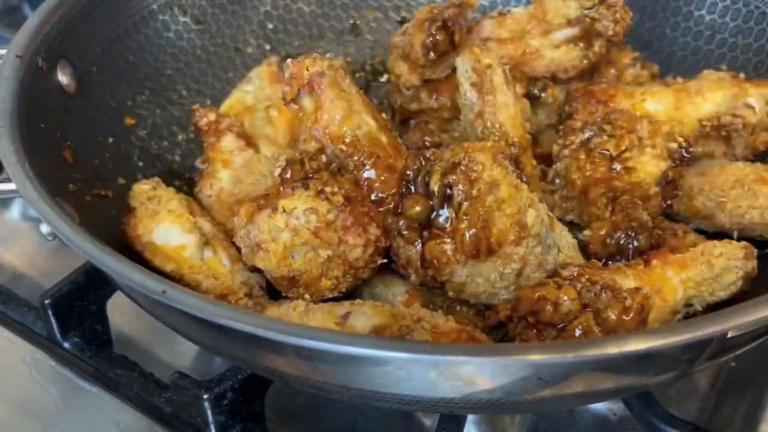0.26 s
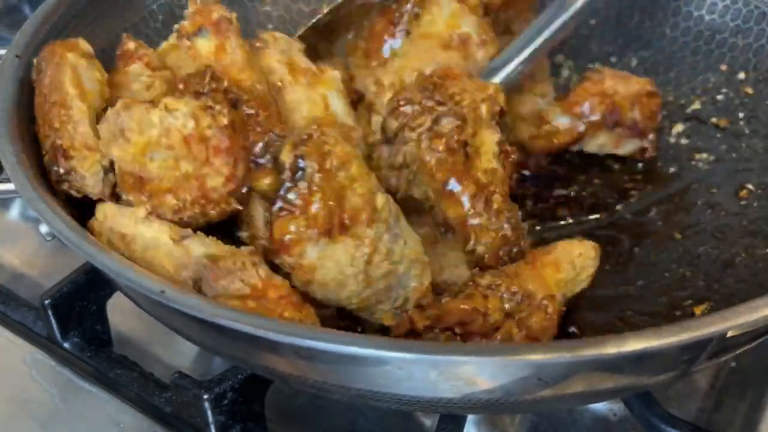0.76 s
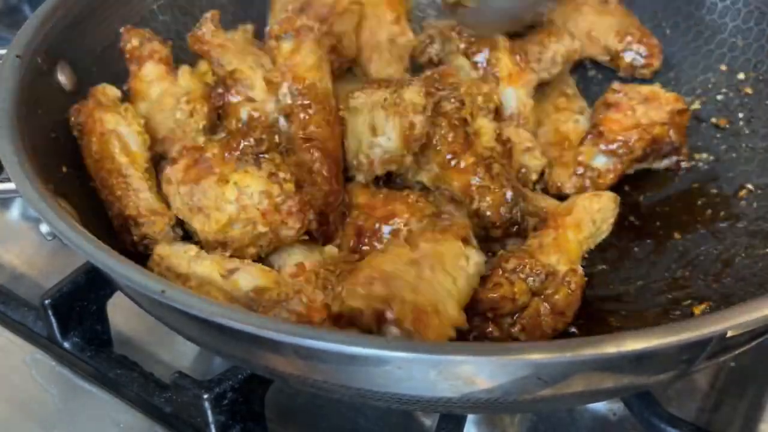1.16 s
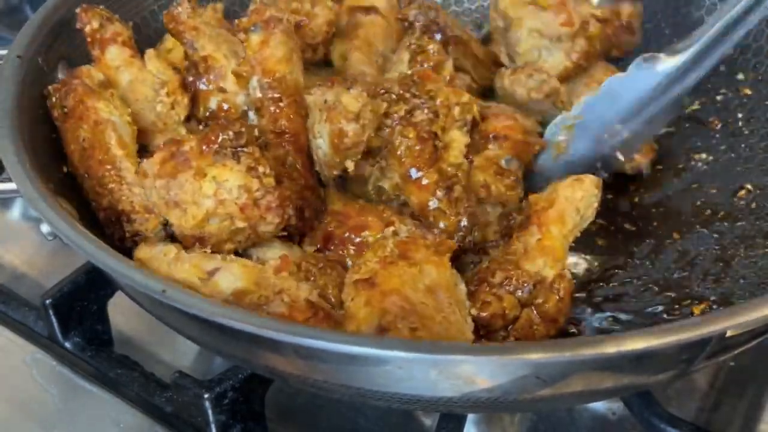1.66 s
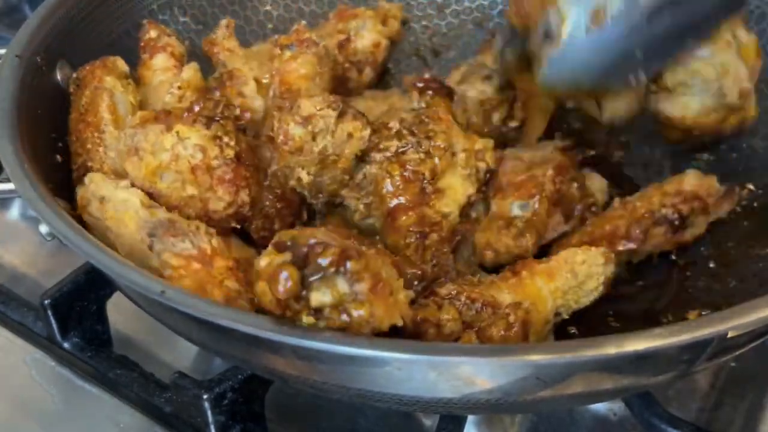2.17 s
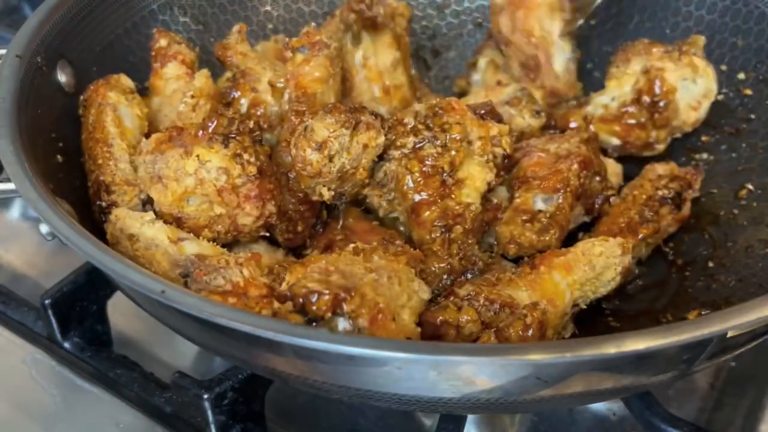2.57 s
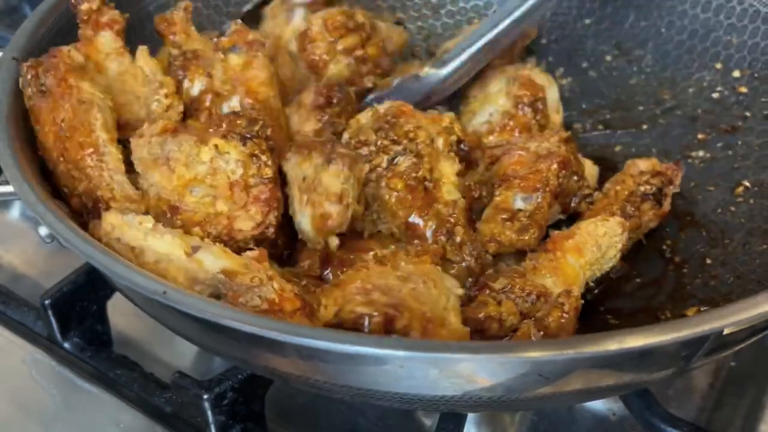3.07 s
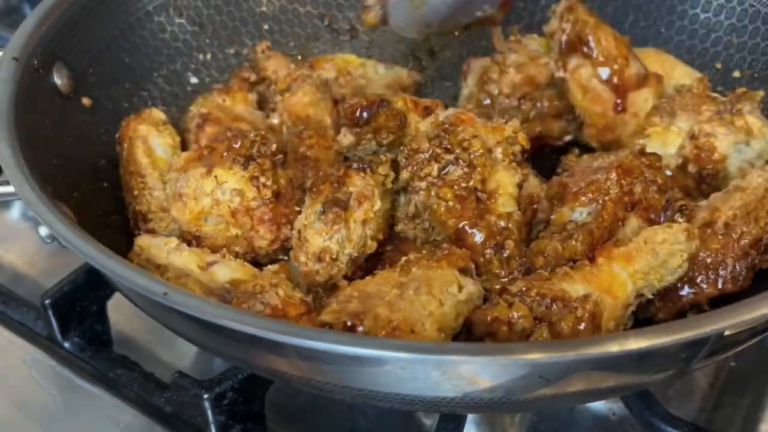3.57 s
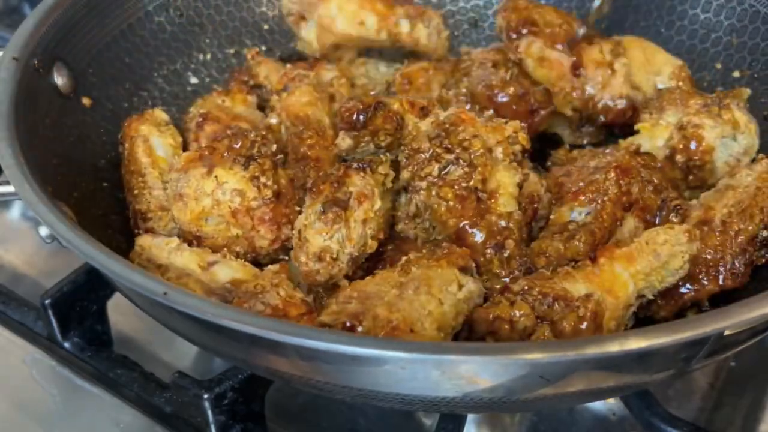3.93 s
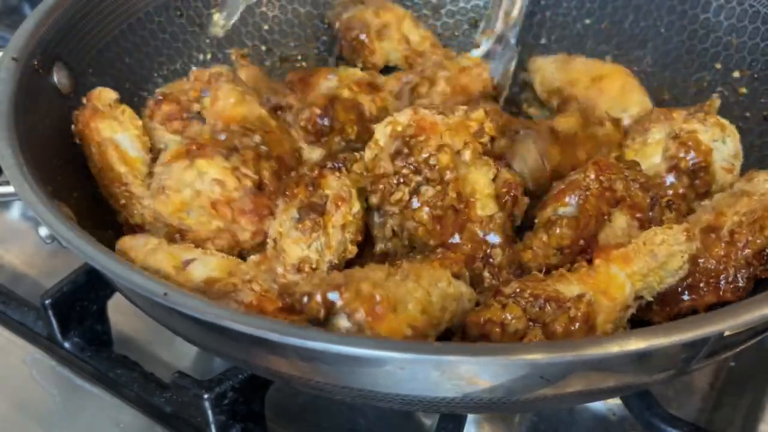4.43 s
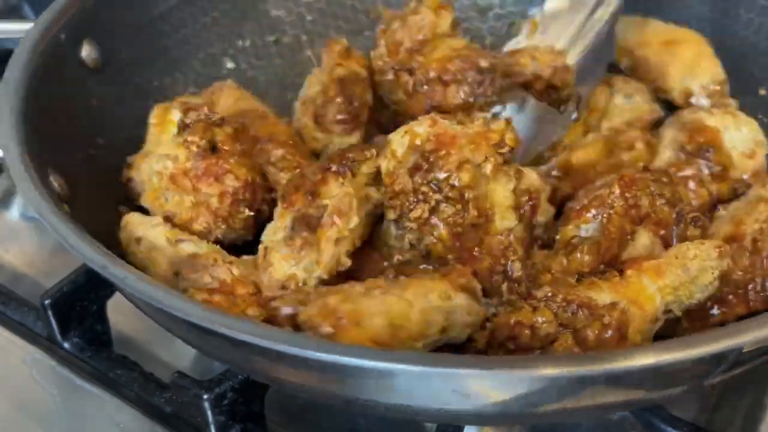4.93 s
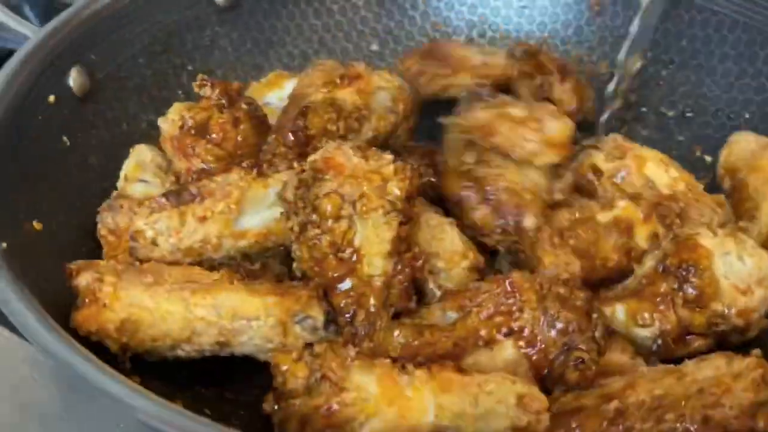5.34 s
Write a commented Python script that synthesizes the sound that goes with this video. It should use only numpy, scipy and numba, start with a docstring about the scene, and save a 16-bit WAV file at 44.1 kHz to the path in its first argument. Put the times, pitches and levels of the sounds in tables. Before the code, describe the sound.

Steel tongs scrape and clank in a steel wok as sticky, crusty fried chicken wings are shoved, turned and tumbled, heard close up.

```python
"""Tongs turning sticky wings in a wok

Steel tongs turn sticky fried chicken wings in a steel wok on a kitchen hob, heard from close by.
Strokes land with clanks: a noise burst, a sine ping and the decaying modes of the bowl.
Random tiny slips make the tips judder over the steel, the crusts crackle and the soft pieces thud.
Underneath, filtered noise gives a low kitchen rumble, a faint hiss and the wok rocking on its stand."""
import sys
import numpy as np
from scipy import signal
from scipy.fft import rfft, irfft, next_fast_len
from scipy.io import wavfile
from scipy.ndimage import uniform_filter1d
from numba import njit

SR = 44100
rng = np.random.default_rng(int(sys.argv[2]) if len(sys.argv) > 2 else 0)


def master(y):
    """Save y as 16-bit WAV."""
    cut = np.clip(np.atleast_2d(y).T, -1, 1)
    pcm = np.round(cut * 32767)  # scale
    wavfile.write(sys.argv[1], SR, pcm.astype(np.int16))


N = 246959  # length of the scene [samples]
TIME = np.arange(N) / SR  # [s]


def undb(db):
    """Turn decibels into a gain."""
    return 10 ** (np.asarray(db) / 20)


def unit(x):
    """Scale a sound to rms 1."""
    return x / np.sqrt(np.mean(x ** 2))


def colour(x, points):
    """Shape a sound by (pitch [Hz], level [dB]) points, causally, so that attacks stay sharp."""
    hz, db = np.transpose(points)
    size = 2 * next_fast_len(x.shape[-1])
    f = np.maximum(np.fft.rfftfreq(size, 1 / SR), 1)
    curve = np.log(undb(np.interp(np.log(f), np.log(hz), db)))
    low_cut = 2 * np.log(np.minimum(f / hz[0], 1) + 0.056)  # falls away below the first point
    # folding the cepstrum forward in time gives the filter its minimum phase
    cepstrum = irfft(curve + low_cut)
    cepstrum[1:size // 2] *= 2
    cepstrum[size // 2 + 1:] = 0
    shaped = irfft(rfft(x, size) * np.exp(rfft(cepstrum)))
    return shaped[..., :x.shape[-1]]


def pair(length, width):
    """Noise at the two microphones; width is the size of the part in which they differ."""
    mid, side = rng.standard_normal((2, length))
    return np.array([mid + width * side, mid - width * side]) / np.sqrt(1 + width ** 2)


def held(t, hold_s, t60):
    """Gain 1 for a while, then an exponential decay that loses 60 dB in t60 seconds."""
    return np.exp(-np.log(1000) * np.maximum(t - hold_s, 0) / t60)


def fade(t60, length):
    """Exponential decay from the first sample on."""
    return held(TIME[:length], 0, t60)


def through(x, response):
    """Play a sound through an impulse response."""
    return signal.oaconvolve(np.atleast_2d(x), response, axes=1)[:, :N]


def add(out, sound, s):
    """Mix a sound in at a time in seconds."""
    start = int(s * SR)
    out[:, start:start + sound.shape[1]] += sound[:, :N - start]


def even(x, span_s=0.037):
    """Hold a texture near rms 1 over the span, so that the hand alone sets its swell; finer grit stays."""
    size = int(span_s * SR)
    power = np.mean(x ** 2, axis=0)
    smooth_power = uniform_filter1d(uniform_filter1d(power, size), size)
    return x / np.sqrt(smooth_power + 1e-12)


def walk(rate):
    """Smooth random drift with a spread near 1 and `rate` new values a second."""
    knots = rng.standard_normal(N // 50)
    return np.interp(TIME * rate, np.arange(len(knots)), knots)


def slips(rate, scatter_db, judder_db, judder_rate):
    """Tiny contacts that catch and let go: uneven in size, and swelling in bunches as the tips judder."""
    happens = rng.random(N) < rate / SR
    uneven_db = scatter_db * np.minimum(rng.exponential(size=N), 4)
    size = undb(uneven_db + judder_db * walk(judder_rate))
    return happens * size * rng.choice([-1, 1], N)


def dense_ring(points, t60, width):
    """Countless overlapping modes of a sheet: a burst of decaying, coloured noise."""
    return colour(pair(SR // 12, width) * fade(t60, SR // 12), points)


def sliding(x, points, t60, width, rate, count=6):
    """A sheet excited at a moving spot: the mix of its modes keeps shifting."""
    weights = np.array([walk(rate) for _ in range(count)])
    weights /= np.sqrt(np.sum(weights ** 2, axis=0))
    return sum(w * through(x, dense_ring(points, t60, width)) for w in weights)


@njit
def resonate(x, hz, width):
    """A resonance with a moving centre: a state-variable band-pass, width in Hz."""
    y, band, low = np.empty(len(x)), 0., 0.
    for i in range(len(x)):
        g, damping = np.tan(np.pi * hz[i] / SR), width / hz[i]
        v = (band + g * (x[i] - low)) / (1 + g * (g + damping))
        band, low, y[i] = 2 * v - band, low + 2 * g * v, damping * v
    return y


# colour of the low kitchen rumble: (pitch [Hz], relative level [dB per Hz])
RUMBLE_COLOUR = [(13, -1), (22, -33), (43, -6), (91, -5), (124, -3), (140, -2.5), (157, -30), (181, -10),
                 (205, -13.5), (224, -5), (244, 0), (286, -18), (336, -12.5), (420, -16), (550, -44),
                 (920, -120)]
# colour of the faint hiss: (pitch [Hz], relative level [dB per Hz])
HISS_COLOUR = [(250, 9.5), (500, 1.5), (1000, -8), (3000, -12.5), (9000, -31), (13000, -73)]


def kitchen(rocking_gain):
    """A steady low rumble and a faint wavering hiss of noise, and the wok rocking dully on its stand."""
    rumble = unit(colour(pair(N, width=0.038), list(RUMBLE_COLOUR) + [(900, -43), (3000, -66)]))
    hiss = unit(colour(pair(N, width=0.57), HISS_COLOUR)) * undb(0.85 * walk(19))
    stand = [(35, -14.5), (55, 0.5), (80, -4.0), (100, -6.0), (125, 4.0),
             (165, -20.0), (225, -14.5), (300, -14), (1000, -85.5)]
    rocking = even(colour(pair(N, width=0.16), stand), span_s=0.37)
    return undb(-38.5) * rumble + undb(-44.0) * hiss + rocking_gain * rocking


# the tips sliding over the steel: (time [s], length [s], push on the bowl [dB], rasp of the blades [dB],
# push on the crust [dB], pitch of the hollow under the tips at the start [Hz], at the end [Hz],
# share of the hollow [dB])
SLIDES = [(.24, 0.23, -29, -20.5, -15.5, 1700, 1680, -3), (.395, 0.27, -12, -17.5, -19.5, 1600, 1040, -6),
          (1.405, 0.041, -13, -32, -28, 970, 980, -11), (1.455, 0.033, -13.5, -22.5, -27, 1010, 1070, -5),
          (1.585, 0.073, -17, -19, -22, 1020, 1070, 0.5), (1.635, 0.12, -15, -17, -20, 1060, 1520, -7.5),
          (1.77, 0.11, -26.5, -34.5, -37, 1440, 1150, -16), (2.17, 0.043, -28, -32, -29.5, 990, 990, -5.5),
          (2.725, 0.14, -12.5, -18.5, -20.5, 910, 850, -7), (2.86, 0.1, -19.5, -24.5, -22.5, 860, 930, -15),
          (3.02, 0.21, -26, -35, -27.5, 1030, 1060, -6), (3.2, 0.08, -26, -32.5, -26.5, 1110, 1120, -15),
          (4.155, 0.16, -26.5, -25, -23, 1650, 1720, -2), (4.295, 0.12, -15, -18, -18, 1660, 1440, -3),
          (4.435, 0.11, -14, -24.5, -25, 1220, 1110, -16), (4.54, 0.12, -19, -24, -25, 1050, 980, -4.5),
          (4.715, .11, -19, -18, -19.5, 1140, 1310, -31), (4.85, .11, -24, -30, -27, 1260, 1310, -9.5),
          (5.015, 0.11, -20.5, -24.5, -27, 1380, 1120, 1.5), (5.125, 0.11, -25, -26, -27.5, 1160, 990, -1),
          (5.405, 0.17, -25.5, -16, -15, 815, 548, 4.5)]


def hollow_glide():
    """The hollow between tips and bowl glides through each scrape: its pitch in Hz and its share in dB."""
    hz, db = np.full(N, float(SLIDES[0][-3])), np.full(N, float(SLIDES[0][-1]))
    for s, length, *_, start_hz, end_hz, share_db in SLIDES:
        glide = np.interp(TIME, [s, s + length], [start_hz, end_hz])
        hz = np.where(TIME >= s, glide, hz)
        db = np.where(TIME >= s, share_db, db)
    return uniform_filter1d(hz, SR // 50), uniform_filter1d(db, SR // 50)


def swell(s, length, attack_s, release_s, sag_db_per_s=0):
    """One push of the hand as a gain: it builds, holds while sagging, and dies away."""
    t = np.maximum(TIME - s, 0)
    return np.minimum(t / attack_s, 1) * held(t, length, release_s) * undb(-sag_db_per_s * t)


def together(gains):
    """Unrelated sounds sum in power."""
    return np.sqrt(sum(g ** 2 for g in gains) + 1e-12)


# sticky wings pushed over one another: (time [s], length [s], push on the crust [dB])
PUSHES = [(.005, 0.075, -43.5), (0.653, 0.21, -36), (0.865, 0.077, -30), (0.944, 0.12, -38),
          (1.042, 0.087, -37.5), (1.327, 0.061, -27.5), (1.543, 0.058, -35), (1.869, 0.086, -33.5),
          (1.964, 0.062, -45), (2.057, 0.096, -33), (2.215, 0.043, -37.5), (2.31, .02, -45),
          (2.359, 0.02, -33), (2.398, 0.0066, -33.5), (2.472, 0.0063, -40.5), (2.587, 0.013, -37.5),
          (2.678, 0.13, -28.5), (2.936, 0.12, -32.5), (3.299, 0.026, -33), (3.374, .05, -42),
          (3.597, 0.024, -45), (3.666, .012, -37), (3.703, 0.051, -44.5), (3.84, 0.062, -39),
          (3.899, 0.032, -35), (3.982, 0.026, -38), (4.05, 0.029, -47), (4.676, .06, -26.5),
          (4.95, 0.11, -33), (5.271, 0.063, -31), (5.348, 0.065, -30)]
# pieces toppling back and rocking the wok: (time [s], length [s], push of the thuds [dB], rocking [dB])
TOPPLES = [(0, 0.05, -61, -33.5), (0.204, 0.1, -27, -31), (0.357, 0.3, -40, -40), (0.676, 0.16, -43, -35),
           (1.093, 0.13, -30.5, -27), (1.424, 0.071, -30.5, -30), (1.584, .1, -21, -36),
           (1.807, .06, -33, -28.5), (2.123, 0.12, -36, -36.5), (2.95, 0.27, -32.5, -35.5),
           (3.22, 0.082, -33.5, -38), (3.69, 0.07, -40.5, -33.5), (3.892, 0.061, -57, -31.5),
           (4.31, 0.059, -48, -53), (4.502, 0.14, -31, -31.5), (4.701, 0.065, -34, -48),
           (4.841, 0.13, -25.5, -32.5), (5.058, 0.2, -21, -31), (5.42, 0.092, -29, -49)]


def strokes():
    """How hard scrapes, shoves and tumbles drive the bowl, blades, crust, soft pieces and stand."""
    def scraped(column, sag_db_per_s):
        """Add up one column of pushes over all scrapes; the attack is a share of the length."""
        return together(undb(row[column]) * swell(row[0], row[1], 0.22 * row[1], 0.21, sag_db_per_s)
                        for row in SLIDES)

    bowl = scraped(2, 0)
    # a scrape dulls as the tips sink under the food
    blades, crust = scraped(3, 25), scraped(4, 27.5)
    shoved = together(undb(db) * swell(s, length, 0.32 * length, 0.15) for s, length, db in PUSHES)
    thuds, rocks = together(
        undb([[thud_db], [rock_db]]) * swell(s, length, attack_s=0.014, release_s=0.21)
        for s, length, thud_db, rock_db in TOPPLES)

    # a shove also rubs the steel and bumps the pieces
    bowl_gain = together([bowl, undb(1) * shoved])
    blade_gain = together([blades, undb(-7) * shoved])
    crust_gain = together([crust, shoved, undb(-53.5)])  # last: sauce ticking between strokes
    thud_gain = together([thuds, undb(-1.5) * shoved, undb(-15) * bowl])  # last: jostled by scrapes
    rocking_gain = together([rocks, undb(-43)])  # last: the stand's tremble between tumbles
    return bowl_gain, blade_gain, crust_gain, thud_gain, rocking_gain


# colour of the crackling crust: (pitch [Hz], relative level [dB per Hz])
CRUST_COLOUR = [(1500, -15), (4000, -1), (6500, 0), (7600, 1.5), (8700, 4), (10200, 3.5), (11500, 3.5),
                (12500, -1), (13500, -26)]
# colour of the soft tumbling pieces: (pitch [Hz], relative level [dB per Hz])
TUMBLE_COLOUR = [(90, -17.5), (170, -8.5), (260, -10.5), (370, -4), (480, -5), (620, -5), (800, -13),
                 (1300, -48)]


def food(crust_gain, thud_gain):
    """Crust and sauce crackle, in lone ticks when barely touched, densely when pushed; soft pieces thud."""
    pressure = np.sqrt(crust_gain / undb(-23.5))
    crackles = slips(rate=1100 * pressure + 120, scatter_db=2.5, judder_db=2.0, judder_rate=100)
    crust = even(sliding(crackles, CRUST_COLOUR, t60=0.027, width=0.061, rate=12), span_s=0.056)
    bumps = slips(rate=370, scatter_db=-0.5, judder_db=3.0, judder_rate=20)
    tumble = even(sliding(bumps, TUMBLE_COLOUR, t60=0.038, width=0.51, rate=6), span_s=0.14)
    return undb(0.5) * crust * crust_gain + undb(-0.5) * tumble * thud_gain


# modes of the bowl: (pitch [Hz], relative level when struck [dB], t60 when ringing freely [s])
BOWL_MODES = [(361.3, -11, 0.93), (445, -23, 1), (552, -5, 1), (610, -17, 0.85), (734, -8.5, 0.96),
              (882.8, 4, 0.71), (955, -17.5, 0.19), (984.5, -13, 0.96), (1233, -4, 0.19),
              (1404, -14.5, 0.23), (1623, -11.5, 0.38), (1690, -9, 0.21), (1750, -45, 0.11),
              (1873, -22.5, 0.17), (2110, -48, 0.49), (2060, -9.5, 0.17), (2200, -22, 0.13),
              (2484, -8, 0.2), (2820, -16, 0.38), (3070, -9, 0.11), (3000, -17, 0.56), (3600, -13, 0.077),
              (4100, -34, .14), (3750, -20, 0.21)]


def bowl_ring(share, scatter_db, spread, spot_hz, spot_db):
    """Decaying modes of the bowl: the spot touched favours those near one pitch; share scales their t60."""
    hz, db, t60 = np.transpose(BOWL_MODES)
    size, phase, lag = rng.standard_normal((len(BOWL_MODES), 3)).T
    favoured_db = db + spot_db / (1 + (np.log2(hz / spot_hz) / 0.1) ** 2)
    # each mode reaches the two microphones with its own phase
    angle = np.pi * phase + spread * np.tanh(2 * lag) * np.array([[1], [-1]])
    weights = undb(favoured_db + scatter_db * size) * np.exp(1j * angle)
    # chance shares the energy out, but adds none
    weights *= np.linalg.norm(undb(favoured_db)) / np.linalg.norm(weights)
    poles = 2j * np.pi * hz - np.log(1000) / (t60 * share)
    return (weights @ np.exp(np.outer(poles, TIME[:SR // 3]))).imag


# colour of the scraped sheet of the bowl: (pitch [Hz], relative level [dB per Hz])
BOWL_COLOUR = [(450, -29.5), (700, -19.5), (850, 2.5), (1050, -0.5), (1350, -1), (1750, 4.5), (2100, -1),
               (3100, -9), (4200, -18.5), (6500, -42.5)]
# colour of the thin tong blades: (pitch [Hz], relative level [dB per Hz])
BLADE_COLOUR = [(1200, -16), (2200, -2.5), (3000, 0.5), (4000, 0.5), (5500, 0.5), (7000, -7.5),
                (9000, -13.5), (13000, -61)]


def scraping(bowl_gain, blade_gain):
    """The same slips shake the damped bowl, the hollow under the tips and the thin tong blades."""
    # a harder push makes the tips catch more often
    pressure = np.sqrt(bowl_gain / undb(-15))
    friction = slips(rate=1800 * pressure + 150, scatter_db=2.0, judder_db=2.5, judder_rate=150)

    # food and tongs damp the bowl
    ring = bowl_ring(share=0.31, scatter_db=1.5, spread=0.89, spot_hz=1000, spot_db=5.0)
    damped = colour(ring, [(300, -14.0), (750, -5), (900, 2.0), (1050, 7.0),
                           (1700, 4.0), (2500, 14.5), (4500, -8.5)])
    modes = even(through(friction, damped))
    sheet = even(sliding(friction, BOWL_COLOUR, t60=0.014, width=0.33, rate=12))
    blade = even(sliding(friction, BLADE_COLOUR, t60=0.014, width=0.58, rate=16))

    centre_hz, hollow_db = hollow_glide()
    air = through(friction, pair(SR // 50, width=0.21) * fade(0.02, SR // 50))
    for _ in range(2):  # two passes make the resonance steeper
        air = np.array([resonate(channel, centre_hz, 400.0) for channel in air])
    hollow = even(air)

    bowl = undb(-6.0) * modes + undb(-2.0) * sheet + undb(hollow_db) * hollow
    return bowl * bowl_gain + undb(1.97) * blade * blade_gain


# colour of the clack of steel on steel: (pitch [Hz], relative level [dB per Hz])
CLACK_COLOUR = [(200, -41), (600, 8.5), (1000, -26), (1800, 4.5), (2800, -1), (4000, 5), (6000, 6.5),
                (7500, 3.5), (8700, 9.5), (10200, -2), (11500, 9), (13500, -14)]
# tongs hitting the wok: (time [s], relative level of the clack [dB], level of the ping [dB],
# pitch of the ping [Hz], t60 of clack and ping [s], relative level of the bowl's ring [dB],
# time until the tongs damp that ring [s])
HITS = [(0.1118, -13.5, -29, 2090, 0.059, -52, .02), (.2044, 1.5, -19, 1640, .083, -17, 0.1),
        (0.2808, -21, -14.5, 7400, 0.052, -38, 0.025), (.3107, -9, -8.5, 3640, 0.052, -45, .01),
        (.327, -20, -28, 3640, 0.027, -33, 0.0081), (0.9354, -9.5, -35, 8530, 0.04, -35, .02),
        (1.054, -15.5, -46, 4170, 0.04, -34, 0.027), (1.0889, -10, -29, 1930, .067, -23, 0.0098),
        (1.1568, -10.5, -4, 1010, 0.013, -30, 0.016), (1.1735, -17.5, -27, 810, 0.16, -26.5, 0.055),
        (1.304, -3, -20, 1916, 0.12, -16.5, 0.06), (1.365, 3.5, -5, 4000, 0.051, -19, 0.024),
        (1.379, 1, -13, 4200, 0.087, -41, .01), (1.5217, 4.5, -11, 1780, .012, -18, 0.0028),
        (2.3469, -9, -31, 9000, 0.06, -47, .03), (2.6349, 4, -6.5, 1804, 0.03, -13, 0.0095),
        (2.6554, 1, -11.5, 2036, 0.097, -22.5, 0.022), (2.7258, 0.5, -16.5, 2310, 0.03, -30, 0.12),
        (3.0455, -9.5, -25, 2000, 0.14, -43, .018), (3.2246, -2, -20, 8400, 0.049, -29.5, 0.016),
        (3.303, -5, -21, 1820, 0.029, -26, 0.0039), (3.4728, -16, -19.5, 2070, .015, -55, 0.009),
        (4.0514, -8, -27, 7570, 0.042, -20.5, 0.0016), (4.1478, 2.5, -15, 8760, 0.094, -12.5, .015),
        (4.164, 0, -22, 8700, 0.027, -24, 0.03), (4.2149, 0.5, -10, 3710, 0.055, -20.5, 0.0091),
        (4.2597, 3, -14, 6700, 0.029, -27.5, 0.067), (4.6655, 5, -12, 1930, 0.022, -40, .011),
        (4.7446, -12, -10, 3730, 0.041, -37, .01), (4.7687, -0.5, -13, 1686, 0.11, -22.5, 0.02),
        (4.8, 4, -22, 2500, 0.08, -23, 0.0097), (5.089, -9.5, -32, 1680, .08, -24, .015),
        (5.3341, 2.5, -19, 1310, 0.036, -12.5, 0.132)]


def clanks():
    """Steel on steel: a burst of chatter, a sine ping, and the bowl ringing until the tongs press on it."""
    out, t = np.zeros((2, N)), TIME[:SR // 3]
    for s, clack_db, ping_db, ping_hz, t60, ring_db, free_s in HITS:
        chatter = unit(colour(pair(len(t), width=0.47), CLACK_COLOUR))
        # 1.1 ms of contact, a decay, and a weak longer tail
        clack = chatter * (held(t, 0.0011, t60) + undb(-25) * fade(0.28, len(t)))
        ping = np.sin(2 * np.pi * ping_hz * t) * fade(t60, len(t))
        ring = bowl_ring(share=1.0, scatter_db=5.5, spread=0.5, spot_hz=ping_hz, spot_db=15.5)
        ring = ring * held(t, free_s, t60=0.046)
        add(out, undb(clack_db - 11.0) * clack + undb(ping_db) * ping + undb(ring_db) * ring, s)
    return out


def scene():
    """The wok close by, with a short wash from the kitchen walls, over the kitchen's own sound."""
    bowl, blades, crust, thuds, rocks = strokes()
    wok = scraping(bowl, blades) + food(crust, thuds) + clanks()
    # the wash is decaying noise that begins 6 ms after the direct sound
    length = SR // 2
    walls = colour(pair(length, width=0.84), [(150, -9.0), (1000, 1.0), (5000, -5), (13000, -8)])
    walls = walls * fade(0.3, length) * (TIME[:length] > 0.006)
    wash = through(wok, walls / np.sqrt(np.sum(walls[0] ** 2)))
    return wok + undb(-13.5) * wash + kitchen(rocks)


# phase by which the left microphone port leads; it swings a full turn at the port's resonance:
# (pitch [Hz], lead [radians])
PORT_LEAD = [(100, 0), (700, .3), (1700, 0), (2800, .8), (6300, .3), (7700, .8), (8700, 0), (10200, -np.pi),
             (11700, -2 * np.pi)]


def record(dry, balance_db=0.67):
    """Two microphone ports that differ in phase; loud peaks are rounded and the top is cut at 13.3 kHz."""
    size = next_fast_len(N + SR)
    lead = np.interp(np.fft.rfftfreq(size, 1 / SR), *np.transpose(PORT_LEAD))
    left = irfft(rfft(dry[0], size) * np.exp(1j * lead), size)[:N]
    ports = np.array([left * undb(balance_db), dry[1] * undb(-balance_db)])
    rounded = 1.014 * np.tanh(ports / 1.125)
    top_cut = signal.ellip(8, 0.2, 70, 13300, fs=SR, output="sos")
    return signal.sosfilt(top_cut, rounded)


dry = scene()
out = record(dry)
master(out)
```